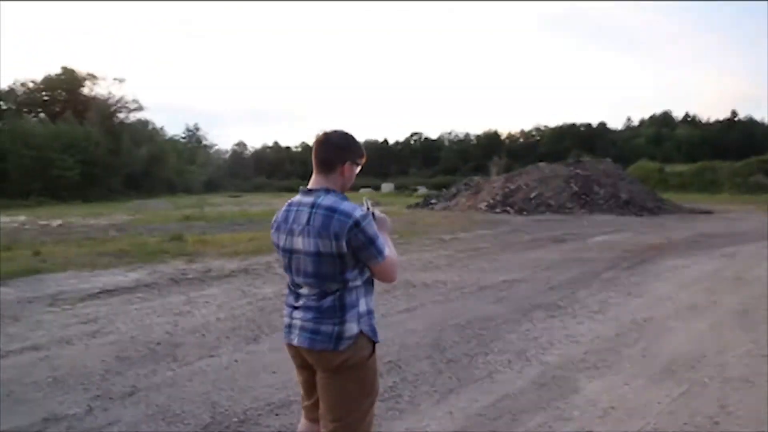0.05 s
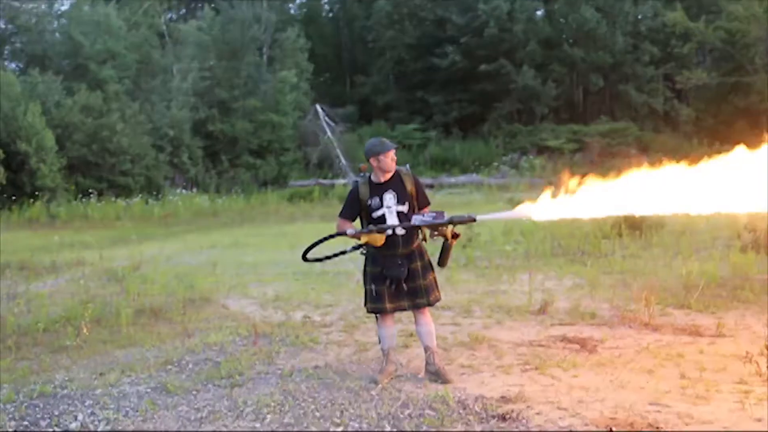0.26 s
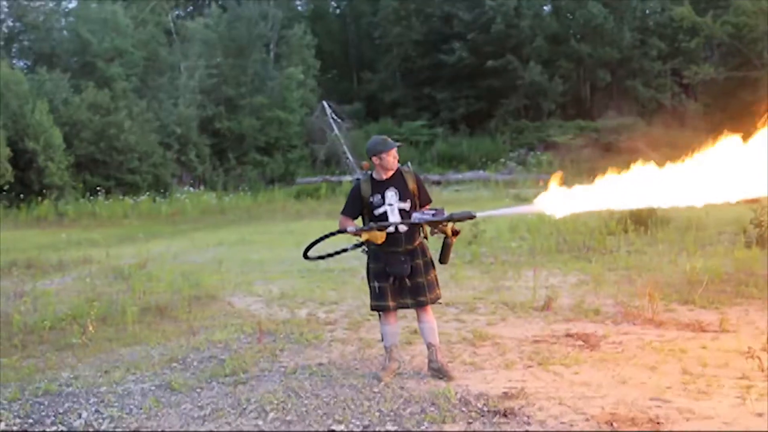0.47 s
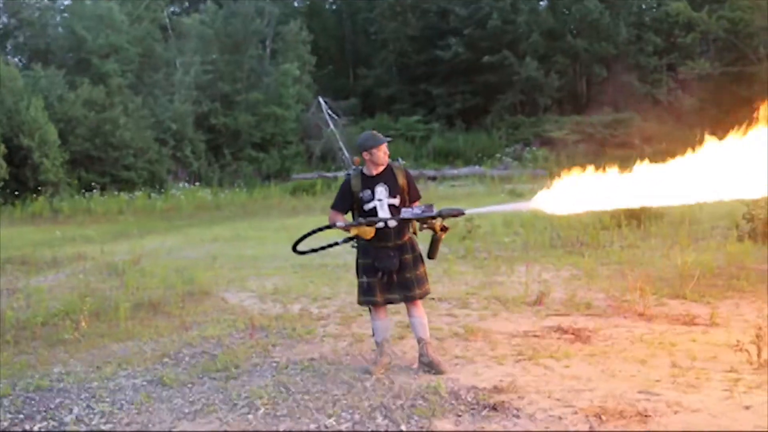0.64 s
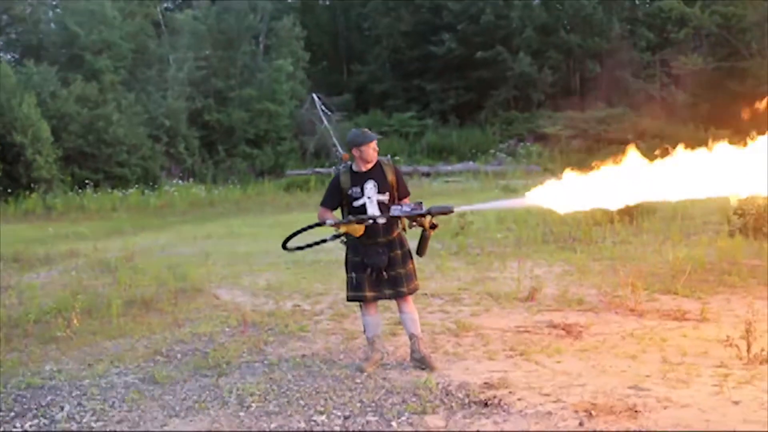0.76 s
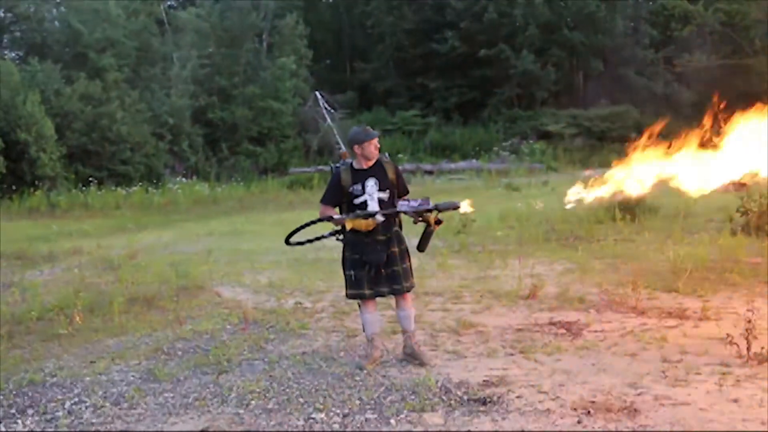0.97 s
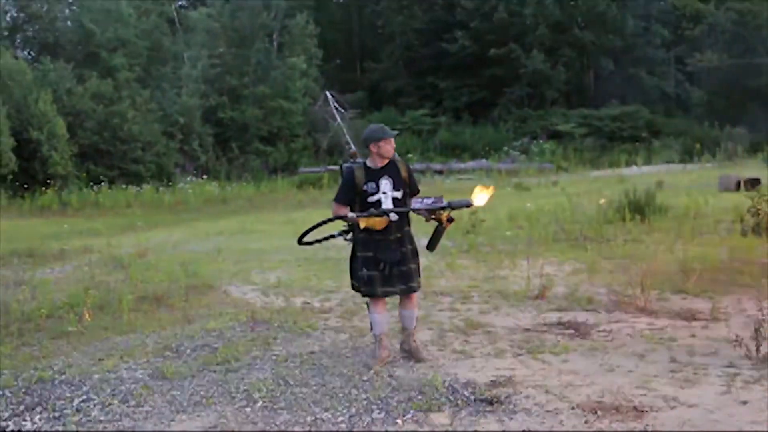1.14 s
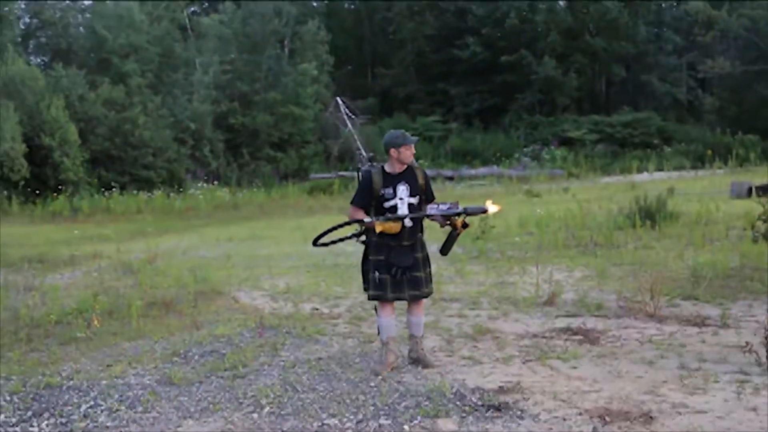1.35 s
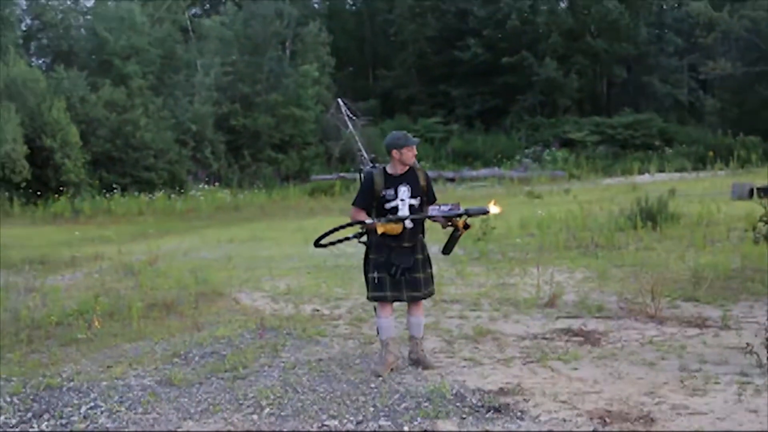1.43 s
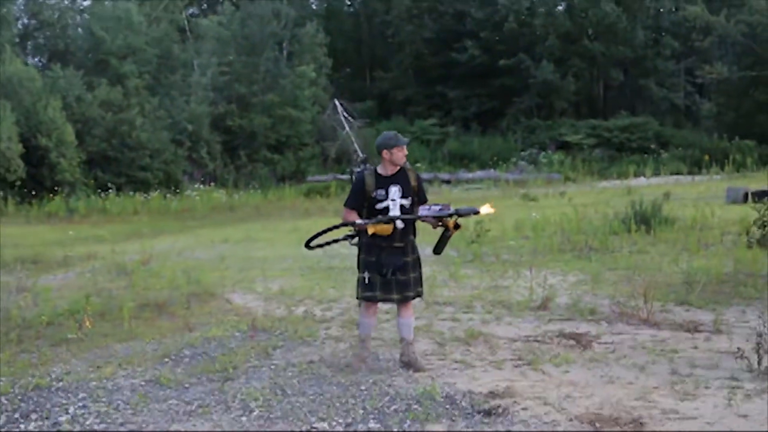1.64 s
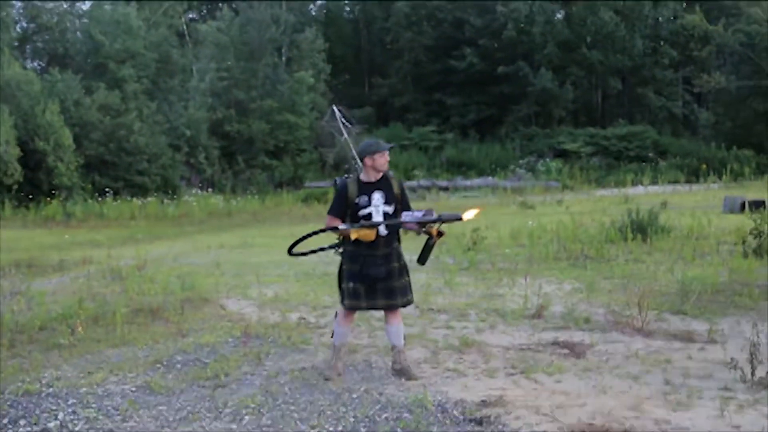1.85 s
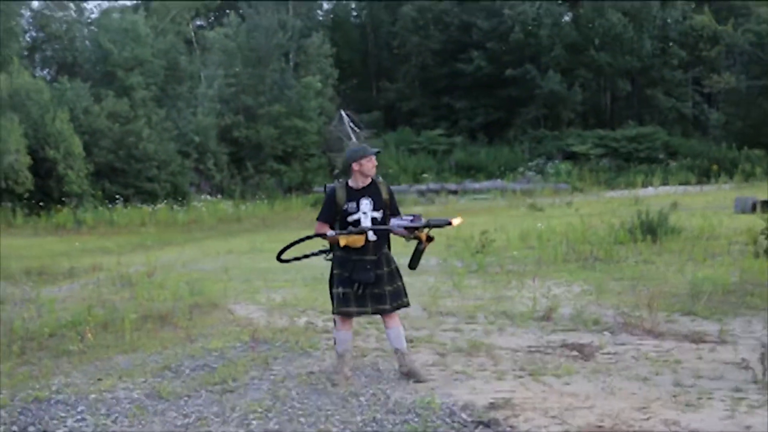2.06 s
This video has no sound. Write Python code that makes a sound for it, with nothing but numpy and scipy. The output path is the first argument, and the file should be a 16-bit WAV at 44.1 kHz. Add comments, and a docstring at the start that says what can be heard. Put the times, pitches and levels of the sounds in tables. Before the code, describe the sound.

A flamethrower cuts in abruptly at 0.2 seconds, after faint outdoor air and a split second of silence. Its loud, deep roar carries quick thumps, rushing flame and a thin fizz of fuel. From about 1 second it burns out with a last puff and a hollow gulp. Gas hisses softly from 1.2 to 1.4 seconds, and a quiet pilot flame flutters and sputters until about 2 seconds.

```python
"""Flamethrower burst and burnout.

Outdoor air, a short silence, then a flamethrower cuts in: deep billows, a rushing blaze, fuel spray.
The valve shuts: the spray dies away and the fireball burns out with a few last puffs. The remaining
gas hisses from the nozzle, and the pilot torch flutters on in its tube."""
import sys
import numpy as np
from scipy.fft import rfft, irfft, next_fast_len
from scipy.io import wavfile
from scipy.ndimage import map_coordinates

SR = 44100
rng = np.random.default_rng(int(sys.argv[2]) if len(sys.argv) > 2 else 0)


def waveform_to_disk(signal):
    """Save audio, clipped to [-1, 1], as 16-bit WAV at the path in sys.argv[1]."""
    frames = np.transpose(np.atleast_2d(signal))
    scaled = np.clip(frames, -1, 1) * 32767
    samples = np.round(scaled).astype(np.int16)
    wavfile.write(sys.argv[1], SR, samples)


N = 92610
T = np.arange(N) / SR
AIR_END_S, CUT_IN_S = 0.143, 0.2218


def amp(db):
    """Decibels to gain."""
    return 10 ** (np.asarray(db) / 20)


def unit_rms(x):
    """x scaled to rms 1."""
    return x / np.sqrt(np.mean(x ** 2) + 1e-20)


def curve(rows):
    """Each column after the time, interpolated per sample; the end values hold."""
    times_s, *columns = np.transpose(rows)
    return np.squeeze([np.interp(T, times_s, column) for column in columns])


def wobble(rate_hz):
    """Smooth random curve with rate_hz knots a second."""
    return map_coordinates(rng.standard_normal(4096), [T * rate_hz + 2], mode="wrap")


def turbulence(flutter_db, rate_hz):
    """Noise whose strength flutters as eddies pass."""
    return rng.standard_normal(N) * amp(flutter_db * wobble(rate_hz))


def filtered(x, response):
    """x through a zero-phase filter of gain response(hz)."""
    size = next_fast_len(N + SR // 2)
    hz = np.fft.rfftfreq(size, 1 / SR)
    return irfft(rfft(x, size) * response(hz), size)[:N]


def coloured(x, spectrum):
    """x shaped by (Hz, dB) points, rms 1."""
    points_hz, points_db = np.transpose(spectrum)
    def response(hz):
        return amp(np.interp(np.log(hz + 1), np.log(points_hz + 1), points_db))
    return unit_rms(filtered(x, response))


def resonant(x, modes):
    """x through steep-sided (centre Hz, width Hz, dB) resonances, rms 1."""
    def response(hz):
        power = 0
        for centre_hz, width_hz, db in modes:
            damping = (hz * width_hz) ** 2
            detuning = (centre_hz ** 2 - hz ** 2) ** 2
            power += (amp(db) * damping / (detuning + damping)) ** 2
        return np.sqrt(power)
    return unit_rms(filtered(x, response))


def bursts(rows, relative_width=0.39):
    """Short bell-shaped swells of narrow-band noise."""
    total = np.zeros(N)
    for peak_s, db, hz, half_width_s in rows:
        swell = np.exp(-((T - peak_s) / half_width_s) ** 2)
        band = resonant(rng.standard_normal(N), [(hz, relative_width * hz, 0)])
        total += amp(db) * swell * band
    return total


# Outdoor noise. Each row: frequency in Hz, relative level in dB.
AIR_SPECTRUM = [(25, -19), (65, -23), (115, 3), (155, -4), (230, 3.5), (300, -2.5), (650, -5), (900, -6.5),
                (1120, -4), (1450, -11.5), (2400, -7), (2900, -21), (3300, -16), (4400, -29), (5150, -26),
                (6500, -35), (8600, -31), (12000, -35.5), (15000, -38.5)]
# Bumps and ticks. Each row: peak time in seconds, level in dB, centre in Hz, half-width in seconds.
AIR_TICKS = [(.049, -30, 604, 0.0038), (.07, -40, 2200, .002), (.118, -34, 2300, 0.0016),
             (.14, -45, 1800, 0.0016)]

def open_air(noise_db=-36.5):
    """Steady outdoor noise with a few soft bumps and ticks."""
    air = coloured(turbulence(flutter_db=1.5, rate_hz=103), AIR_SPECTRUM)
    return amp(noise_db) * air + bursts(AIR_TICKS)


def whine(pitch_hz=15680, level_db=-71):
    """A faint, steady, very high tone."""
    return amp(level_db) * np.sin(2 * np.pi * pitch_hz * T)


# Fireball roar. Each row: time in seconds, level in dB.
BILLOW_ENVELOPE = [(.22, -18), (.43, -19), (.52, -20), (.72, -21.5), (.79, -18), (.95, -21), (1.06, -23),
                   (1.155, -25.5), (1.195, -36), (1.32, -53)]
# Roar colour. Each row: frequency in Hz, relative level in dB.
BILLOW_SPECTRUM = [(20, -15), (40, -14), (65, 3.5), (85, 5), (115, -0.5), (150, 1.5), (200, 1), (270, -11),
                   (370, -16), (480, -27.5), (900, -64)]
# Fuel pockets igniting. Each row: centre time in seconds, peak in dB.
FUEL_PUFFS = [(0.224, -35), (0.2522, -6), (.301, -8), (0.357, -10), (0.413, -9), (0.521, -14), (0.855, -15),
              (1.055, -12.5)]

def billows(puff_half_width_s=0.0018):
    """The fireball's low, lumpy roar; each pocket of fuel goes off with one push and pull of air."""
    roar = amp(curve(BILLOW_ENVELOPE)) * coloured(rng.standard_normal(N), BILLOW_SPECTRUM)
    for centre_s, peak_db in FUEL_PUFFS:
        offset = (T - centre_s) / puff_half_width_s
        roar -= amp(peak_db) * offset * np.exp((1 - offset ** 2) / 2)
    return roar


# Burning jet. Each row: time in seconds, level in dB, treble gain in dB.
BLAZE_ENVELOPE = [(.22, -18, -1), (.3, -21, 1), (.365, -25, 4.5), (.46, -20, 1.5), (.6, -21, 2.5),
                  (.7, -22, 1), (.82, -19.5, -1), (.92, -21, -2.5), (1.03, -28, -2), (1.12, -42, 1),
                  (1.25, -83, -10)]
# Rush and crackle colour. Each row: frequency in Hz, relative level in dB.
BLAZE_SPECTRUM = [(180, -31), (300, -6), (380, -2.5), (480, -5), (580, 1.5), (690, 2), (790, -2.5),
                  (930, -10.5), (1110, -7), (1380, -6.5), (1540, -10.5), (1750, -7.5), (2000, -16),
                  (2600, -17), (3130, -14.5), (4020, -20.5), (4400, -19.5), (5250, -30.5), (6000, -29),
                  (8500, -48)]

def blaze(pops_per_s=150, crackle_db=-13.5, ring_db=-14.5, treble_split_hz=1170):
    """Turbulent burning along the jet, dotted with bursting droplets; it dulls as the flame flies off."""
    level_db, treble_db = curve(BLAZE_ENVELOPE)
    eddies = coloured(turbulence(flutter_db=-0.8, rate_hz=77), BLAZE_SPECTRUM)
    pops = (rng.random(N) < pops_per_s / SR) * rng.lognormal(0, 0.22, N)
    crackle = coloured(pops, BLAZE_SPECTRUM)
    ring = resonant(turbulence(flutter_db=-1.5, rate_hz=60), [(1713, 230, 0)])
    rush = eddies + amp(crackle_db) * crackle + amp(ring_db) * ring
    body = filtered(rush, lambda hz: 1 / (1 + (hz / treble_split_hz) ** 4))
    treble = rush - body
    flicker_db = 0.37 * wobble(rate_hz=26.9)
    return amp(level_db + flicker_db) * (body + amp(treble_db) * treble)


# Fuel fizz. Each row: frequency in Hz, relative level in dB.
SPRAY_SPECTRUM = [(3000, -16), (5500, -10), (7000, 3.5), (8500, 2), (10800, 2), (12500, -4), (14000, -12),
                  (15700, -29)]

def fuel_spray(start_db=-38.5, sag_db_per_s=5.5, valve_shut_s=0.82, fall_db_per_s=36):
    """Fuel fizzes out, sags with the tank pressure and dies once the valve shuts."""
    sag_db = sag_db_per_s * (T - CUT_IN_S)
    fall_db = fall_db_per_s * np.maximum(T - valve_shut_s, 0)
    flicker_db = 0.43 * wobble(rate_hz=18.5)
    fizz = coloured(turbulence(flutter_db=1.2, rate_hz=600), SPRAY_SPECTRUM)
    return amp(start_db - sag_db - fall_db + flicker_db) * fizz


# Pilot flame. Each row: time in seconds, level in dB.
PILOT_ENVELOPE = [(1.0, -34.5), (1.25, -33.5), (1.48, -33), (1.58, -30.5), (1.82, -30.5), (1.93, -30.5),
                  (2.1, -30.5)]
# Torch tube resonances. Each row: centre in Hz, width in Hz, relative level in dB.
TUBE_MODES = [(180, 209, 5), (669, 240, 7), (810, 240, 0), (1224, 285, 2.5), (1312, 205, 2.5),
              (2130, 140, -5), (2330, 184, -4), (2830, 1150, -13), (3870, 130, -16.5), (4540, 440, -20.5),
              (5154, 240, -14), (7040, 300, -26), (8040, 180, -24), (10200, 1300, -25.5), (13300, 600, -28)]
# Flame sputters. Each row: peak time in seconds, level in dB, centre in Hz, half-width in seconds.
PILOT_SPUTTERS = [(1.561, -32, 1180, 0.011), (1.814, -29.5, 670, 0.022), (1.872, -23.5, 1190, 0.0019),
                  (1.88, -33, 810, 0.0033), (1.963, -34, 616, 0.0048)]
# Pilot gas flow. Each row: frequency in Hz, relative level in dB.
PILOT_GAS_SPECTRUM = [(25, 1), (80, 7.5), (400, -3), (1000, -7), (1800, -7), (3500, -14.5), (4500, -22.5),
                      (5900, -22.5), (8100, -20), (9200, -21.5), (11000, -23), (12300, -22), (13500, -30),
                      (15300, -34)]

def pilot_torch(gas_db=-41.5):
    """A small flame flutters and sputters in its tube over the hiss of its gas."""
    flame = resonant(turbulence(flutter_db=1.1, rate_hz=150), TUBE_MODES)
    gas = coloured(turbulence(flutter_db=0.9, rate_hz=320), PILOT_GAS_SPECTRUM)
    return amp(curve(PILOT_ENVELOPE)) * flame + bursts(PILOT_SPUTTERS) + amp(gas_db) * gas


# Burnout resonances. Each row: centre in Hz, width in Hz, relative level in dB.
GULP_MODES = [(329, 123, -2), (800, 460, -11)]

def burnout(peak_s=1.059, half_width_s=0.12, level_db=-29):
    """The detached fireball swallows its last fuel with a hollow gulp."""
    swell = np.exp(-((T - peak_s) / half_width_s) ** 4)
    gulp = resonant(turbulence(flutter_db=-1.5, rate_hz=180), GULP_MODES)
    return amp(level_db) * swell * gulp


# Empty nozzle resonances. Each row: centre in Hz, width in Hz, relative level in dB.
NOZZLE_MODES = [(2780, 330, 4), (3240, 130, 2.5), (6730, 340, -4.5), (7400, 280, -5.5), (8130, 470, -5),
                (8970, 390, -9), (9900, 990, -19), (11180, 370, 1), (11650, 400, -14), (12200, 260, -10),
                (13200, 700, -19), (14300, 500, -20)]
# Escaping gas. Each row: frequency in Hz, relative level in dB.
VENT_SPECTRUM = [(1800, -25), (2700, 2), (3300, -3), (4200, 1), (5800, -2), (7000, -6), (9000, 1),
                 (10300, -4), (12000, 2), (13000, -7), (14600, -10), (15500, -22)]

def nozzle_vent(start_s=1.222, peak_s=1.417, peak_db=-39.5, swell_db_per_s=37, edge_db_per_s=267):
    """The remaining gas whistles and hisses through the nozzle, swells and stops."""
    swell_db = swell_db_per_s * np.minimum(T - peak_s, 0)
    outside_s = np.maximum(start_s - T, 0) + np.maximum(T - peak_s, 0)
    level_db = peak_db + swell_db - edge_db_per_s * outside_s
    whistle = resonant(turbulence(flutter_db=2.5, rate_hz=60), NOZZLE_MODES)
    hiss = coloured(turbulence(flutter_db=-1.0, rate_hz=230), VENT_SPECTRUM)
    return amp(level_db) * (whistle + amp(-8.5) * hiss)


def scene():
    """Open air, a silent gap, then the flamethrower; the whine runs under both sounds."""
    air = open_air()
    tone = whine()
    flamethrower = billows() + blaze() + fuel_spray() + pilot_torch() + burnout() + nozzle_vent()
    mix = (T < AIR_END_S) * (air + tone) + (T > CUT_IN_S) * (flamethrower + tone)
    return mix[None]


def record(dry, ceiling=0.72, cutoff_hz=15780):
    """Soft clip on the highest peaks, then a steep low-pass."""
    mono = dry[0]
    rounded = mono / (1 + np.abs(mono / ceiling) ** 6) ** (1 / 6)
    return filtered(rounded, lambda hz: 1 / (1 + (hz / cutoff_hz) ** 400))[None]


dry = scene()
out = record(dry)
waveform_to_disk(out)
```